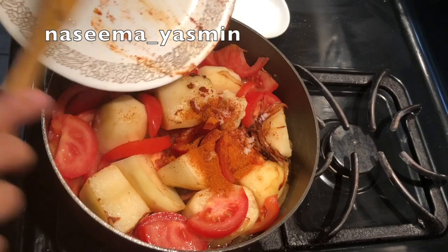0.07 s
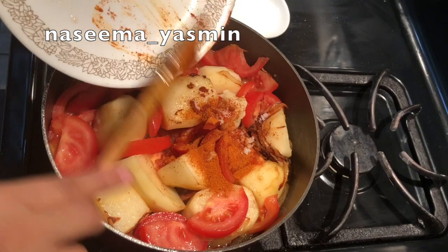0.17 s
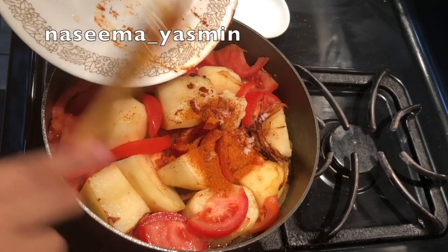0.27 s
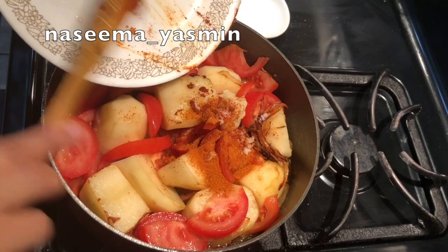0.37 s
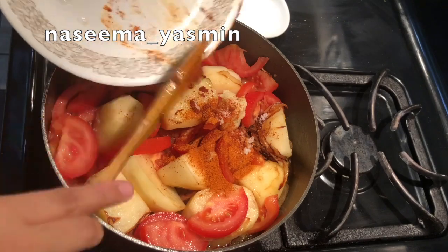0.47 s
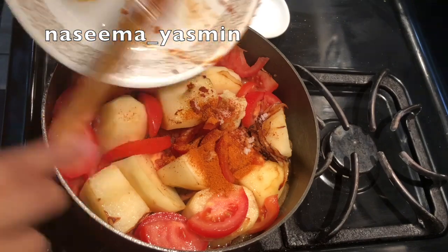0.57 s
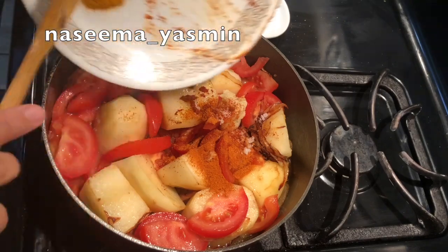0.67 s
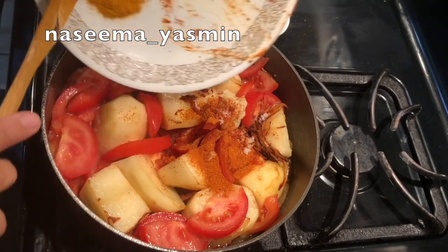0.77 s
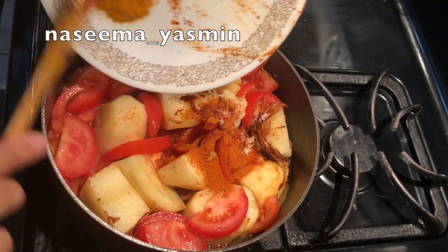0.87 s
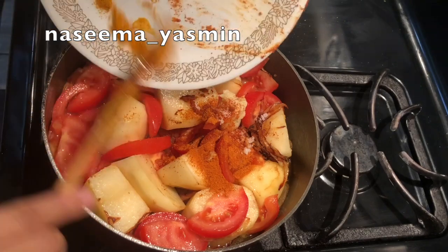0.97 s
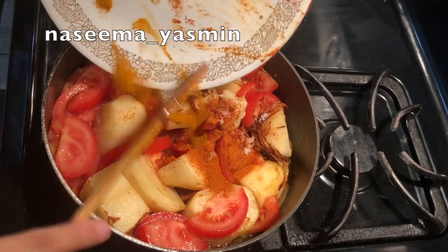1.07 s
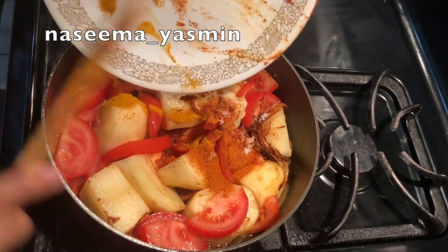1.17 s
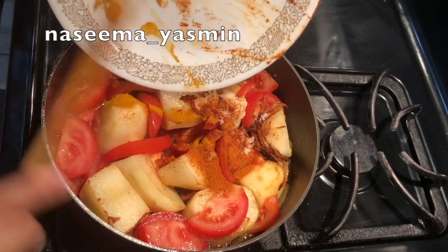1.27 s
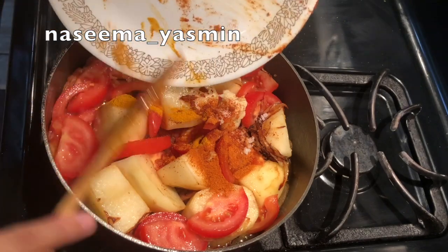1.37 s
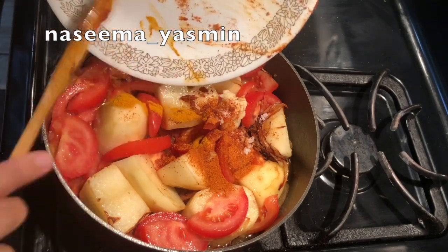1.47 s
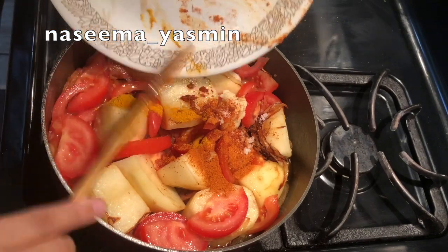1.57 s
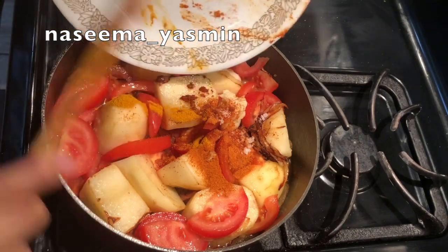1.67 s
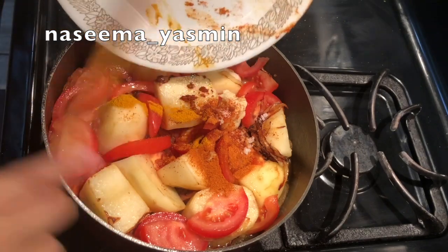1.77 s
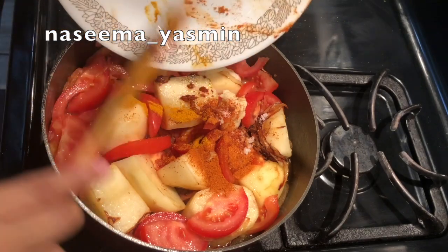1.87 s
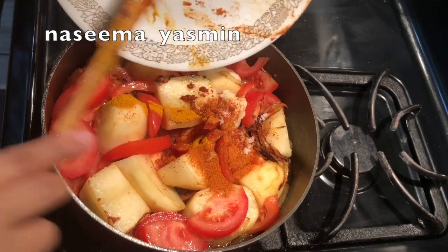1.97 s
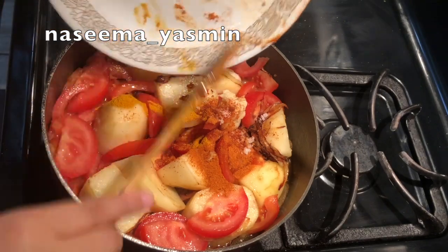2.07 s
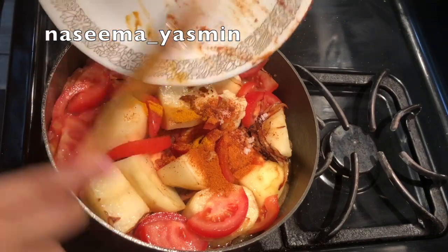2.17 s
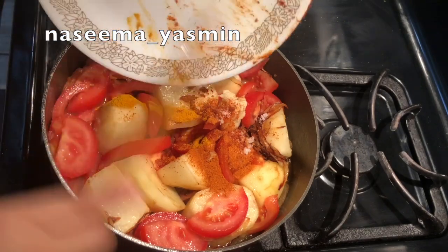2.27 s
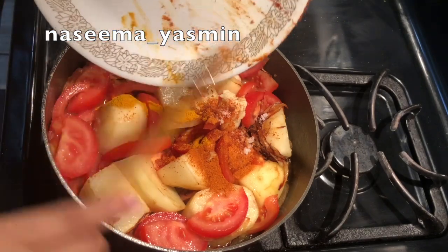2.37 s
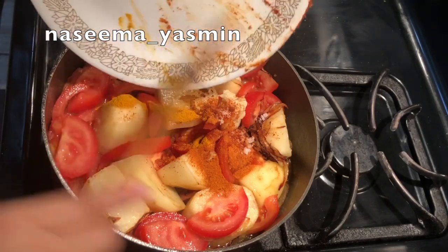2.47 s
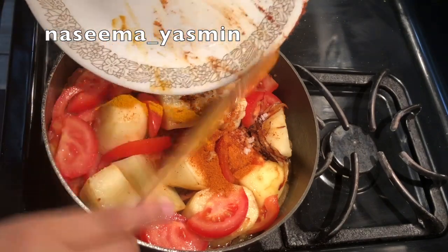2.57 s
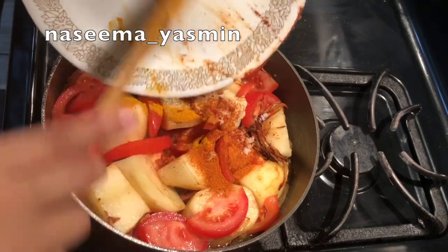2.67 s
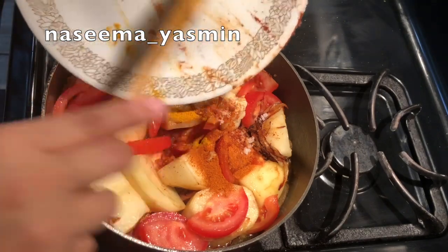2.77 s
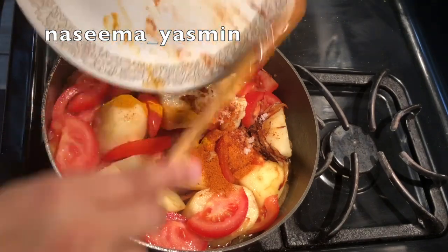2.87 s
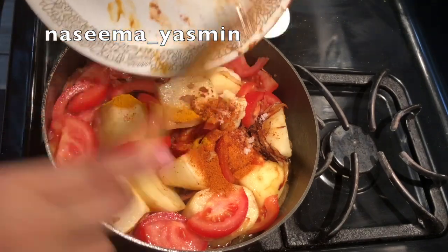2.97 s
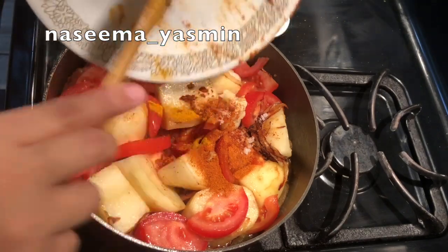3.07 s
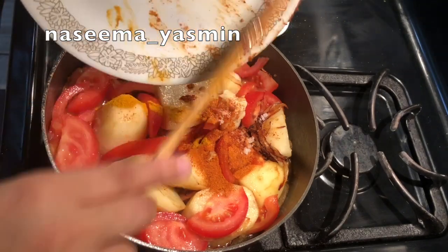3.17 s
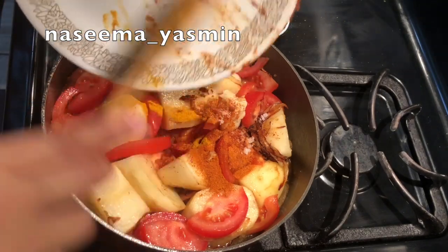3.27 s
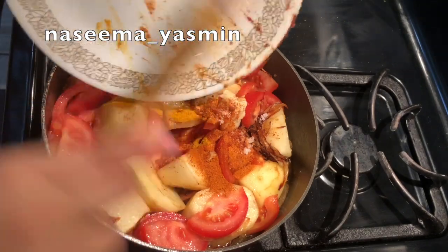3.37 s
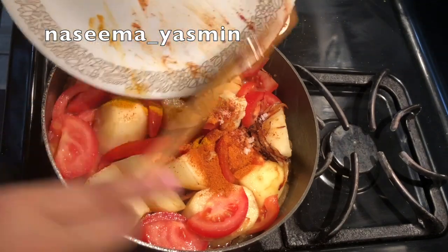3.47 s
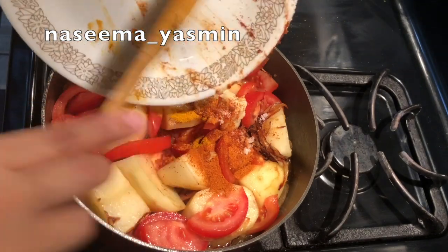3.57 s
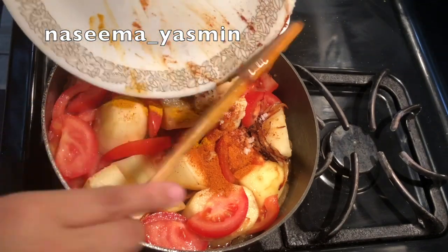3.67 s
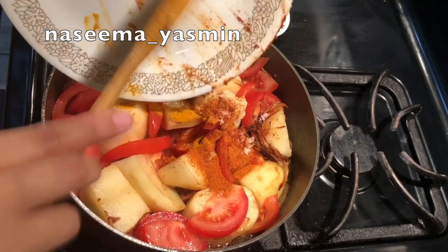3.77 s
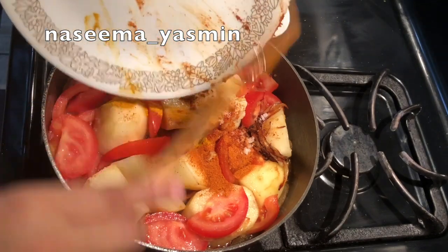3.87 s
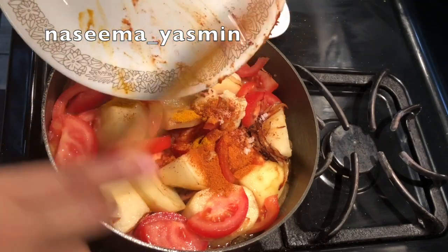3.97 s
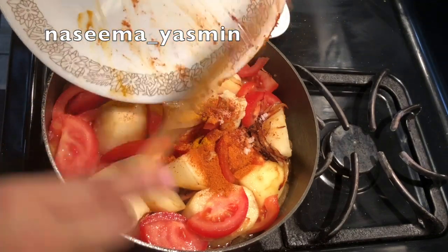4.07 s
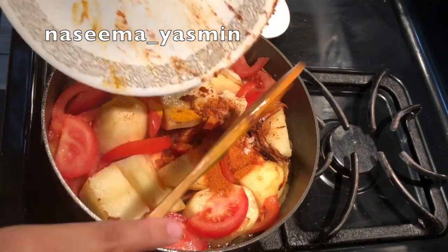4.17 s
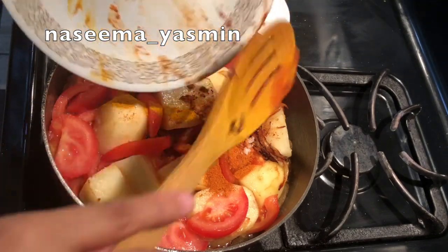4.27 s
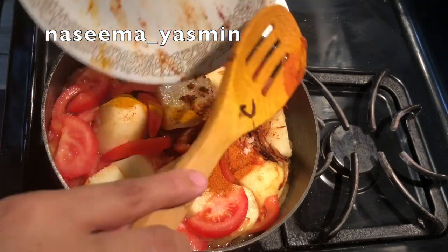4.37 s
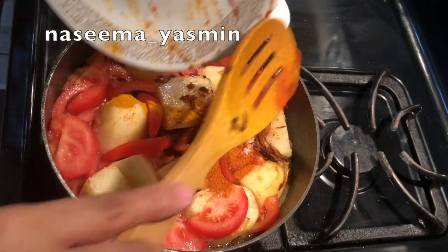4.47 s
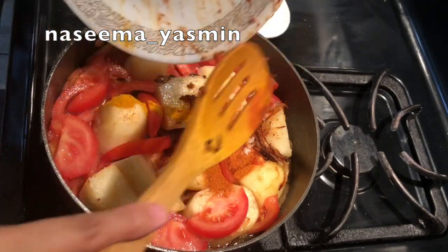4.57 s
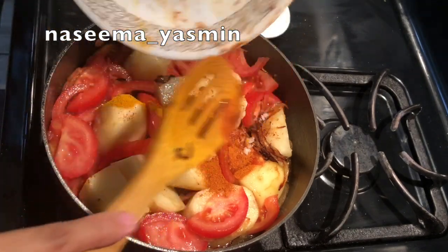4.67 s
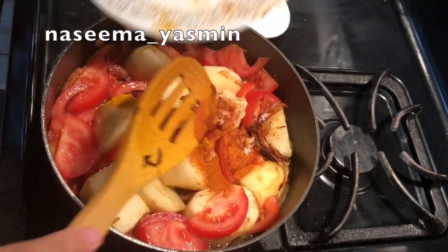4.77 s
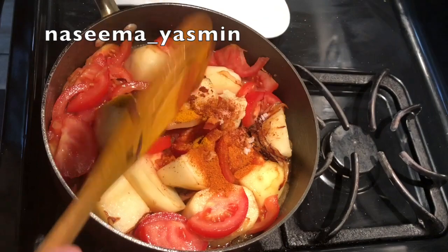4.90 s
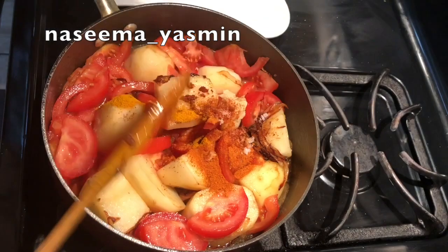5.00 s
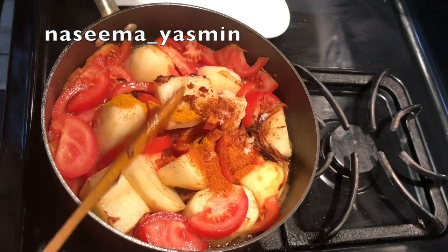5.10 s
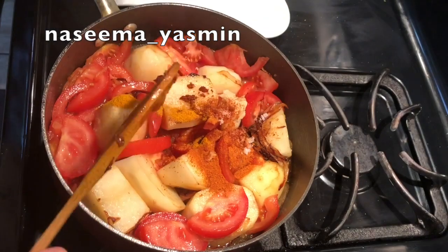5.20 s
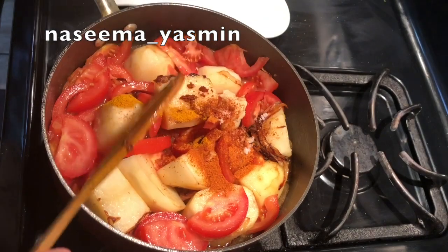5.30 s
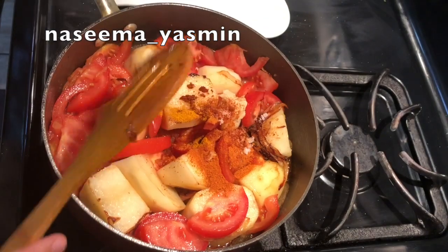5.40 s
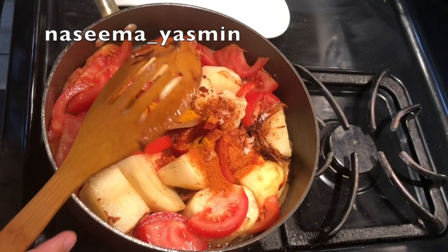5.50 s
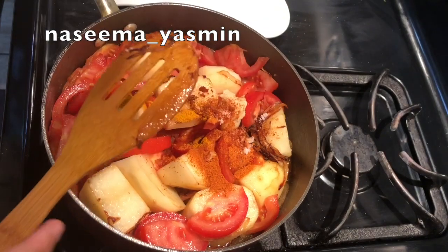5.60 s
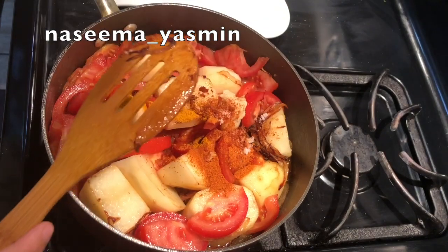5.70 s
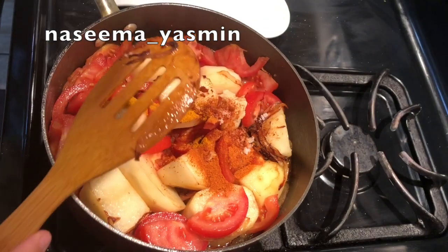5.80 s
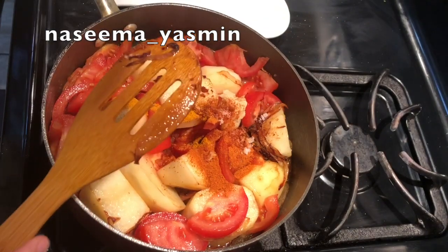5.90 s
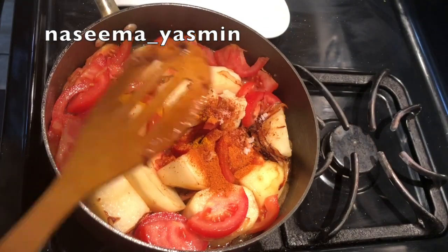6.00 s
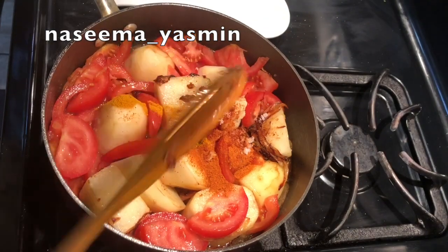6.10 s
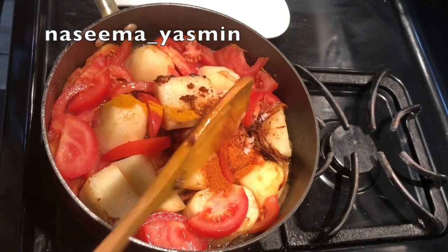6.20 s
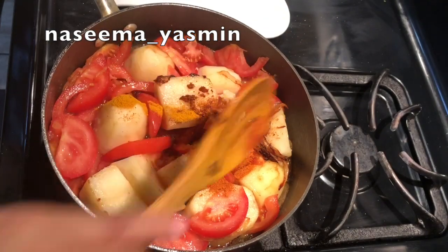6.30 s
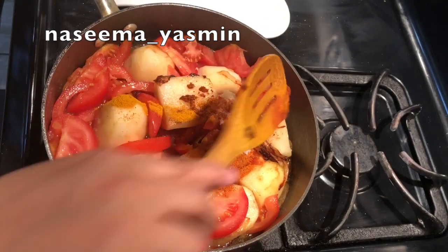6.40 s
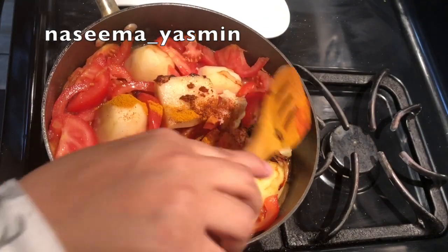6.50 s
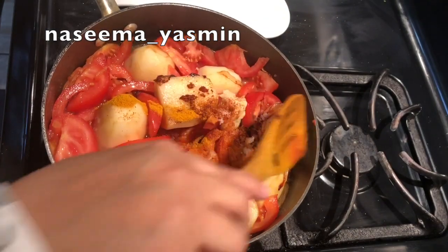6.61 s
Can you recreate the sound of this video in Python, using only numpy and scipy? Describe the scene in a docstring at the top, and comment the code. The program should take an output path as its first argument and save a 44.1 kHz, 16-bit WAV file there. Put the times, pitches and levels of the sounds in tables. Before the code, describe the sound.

Close by in a small kitchen, a pot sizzles quietly over a gas flame and a very faint appliance hum. For about four seconds a wooden spatula knocks unevenly on a ceramic plate, with quick scrapes between the ringing taps. The sizzle then brightens, something bumps the worktop twice, and the plate lands with a sharp clatter, rocking briefly before it settles and leaves only the spitting oil.

```python
"""Spatula, plate and sizzling pot

A wooden spatula taps and scrapes spices off a hand-held ceramic plate over a faintly sizzling pot.
A tap is a dull knock plus the plate's damped ring; a scrape is stick-slip driving the plate's modes.
The plate leaves the pot, the oil spits more brightly, and the plate is set down beside the stove:
two bumps and a bright clatter in a small kitchen. A burner rushes and an appliance hums throughout."""
import sys
import numpy as np
from scipy import signal
from scipy.fft import rfft, irfft
from scipy.io import wavfile
from scipy.ndimage import uniform_filter1d

SR = 44100
rng = np.random.default_rng(int(sys.argv[2]) if len(sys.argv) > 2 else 0)


def generate_wav(signal):
    """Clip the signal to [-1, 1] and save it as 16-bit WAV at the path in sys.argv[1]."""
    frames = np.transpose(np.atleast_2d(signal))
    scaled = np.clip(frames, -1, 1) * 32767
    pcm = np.round(scaled).astype(np.int16)
    wavfile.write(sys.argv[1], SR, pcm)


N = 293255
EVENT_N = int(.7 * SR)
EVENT_S = np.arange(EVENT_N) / SR  # time axis of one event
PLATE_LOW_HZ, PLATE_HIGH_HZ = 1230, 2188

# oil hiss spectrum: freq_hz, gain_db
OIL_HISS = [(1500, -22), (4000, -7), (8000, -1), (11300, 0), (13000, -6), (16000, -17)]
# weaker plate modes beside the low ring: freq_hz, gain_db, t60_s
PLATE_SIDE_MODES = [(1423, -23.5, 0.094), (1580, -21, 0.016), (1620, -15.5, 0.035)]
# plate modes reached by hard contact: freq_hz, gain_db, t60_s
PLATE_TOP_MODES = [(3615, 4.5, .09), (3990, 4.5, .05), (4790, 4, .08), (6060, 0, .043), (7440, -3, .056),
                   (8400, -1, .029)]
# short-lived spatula modes: freq_hz, gain_db, t60_s
SPATULA_MODES = [(772, -20, 0.1), (892, -1.5, 0.028), (1015, -0.5, 0.023), (1180, 0.5, 0.017)]
# spectrum of spice grit, clicks and rattle: freq_hz, gain_db
GRIT_SPECTRUM = [(300, -35), (1500, -25), (4000, 0), (7500, -0.5), (11000, -2.5), (16000, -15)]


def undb(db):
    """Decibels to gain."""
    return 10 ** (np.asarray(db) / 20)


def level(x, db):
    """Scale to an rms level."""
    return x * undb(db) / np.sqrt(np.mean(x ** 2))


def crest(x, db):
    """Scale the loudest 7 ms to an rms level."""
    return x * undb(db) / np.sqrt(uniform_filter1d(x ** 2, size=300, mode="constant").max())


def add(out, start_s, x):
    """Mix x into out."""
    i = int(start_s * SR)
    out[i:i + len(x)] += x[:N - i]


def along(points, hz):
    """Interpolate (freq_hz, value) points over log frequency."""
    freqs_hz, values = np.transpose(points)
    return np.interp(np.log(hz + 1), np.log(freqs_hz), values)


def colour(x, points):
    """Filter by (freq_hz, gain_db) points."""
    return irfft(rfft(x) * undb(along(points, np.fft.rfftfreq(len(x), 1 / SR))), len(x))


def fade(t60_s):
    """Exponential decay."""
    return np.exp(-np.log(1000) * EVENT_S / max(t60_s, 1e-3))


def swell(rise_s):
    """Smooth onset."""
    return 1 - np.exp(-(EVENT_S / rise_s) ** 2)


def ring(modes, scatter_db=0):
    """Damped modes (freq_hz, gain_db, t60_s); the spot struck randomises strength and sign."""
    draws = rng.standard_normal((len(modes), 2))
    return sum(np.sign(side) * undb(db + scatter_db * size)
               * np.sin(2 * np.pi * hz * EVENT_S) * fade(t60_s)
               for (hz, db, t60_s), (size, side) in zip(modes, draws))


def wash(spectrum_db, t60s_s):
    """Dense modes as octave bands of noise, each with its own decay."""
    spectrum = rfft(colour(rng.standard_normal(EVENT_N), spectrum_db))
    octave = np.log2(np.clip(np.fft.rfftfreq(EVENT_N, 1 / SR), 62.5, 16000) / 62.5)
    centres_hz = 62.5 * 2 ** np.arange(9)
    return sum(irfft(spectrum * np.maximum(1 - abs(octave - k), 0), EVENT_N) * fade(along(t60s_s, hz))
               for k, hz in enumerate(centres_hz))


def drive(force, response):
    """Play a force through a resonating body."""
    return signal.fftconvolve(force, response)[:len(force)]


def walk(rate_hz):
    """Random wander, spread near 1."""
    step = int(SR / rate_hz)
    return uniform_filter1d(np.repeat(rng.standard_normal(N // step + 1), step), step)[:N]


def sizzle(burner_db=-45, bubble_db=-51, spread_db=5.0, count=6000):
    """Burner rush under tiny oil bubbles, each ringing a few cycles at its own pitch."""
    # burner rush: freq_hz, gain_db
    burner_spectrum = [(15, -60), (25, -35), (40, -15), (55, -5.5), (166, -6), (206, -16), (242, -3.5),
                       (317, -5), (344, -0.5), (476, -6), (775, 0.5), (1040, 0), (2550, -1.5),
                       (10700, -17.5), (16000, -27)]
    # bursting bubbles: pitch_hz, gain_db
    pop_spectrum = [(800, -13), (2500, 0), (4500, 6), (7000, 1.5), (11000, -57), (16000, -45.5)]
    bubbles = np.zeros(N)
    t = EVENT_S[:int(.02 * SR)]
    for when, pitch, size in rng.random((count, 3)):
        hz = 1500 * 8 ** pitch
        gain = undb(spread_db * min(-np.log(size), np.pi) + along(pop_spectrum, hz))
        add(bubbles, when * N / SR, gain * np.sin(2 * np.pi * hz * t) * np.exp(-t * hz / 6))
    rush = level(colour(rng.standard_normal(N), burner_spectrum), burner_db) * undb(.5 * walk(10))
    return rush + level(bubbles, bubble_db) * undb(.5 * walk(1.3))


def crackle(level_db=-58.5, spread_db=4, max_decay_s=.013, count=260):
    """Small random spits of oil, mostly faint, each a brief puff."""
    out = np.zeros(N)
    t = EVENT_S[:2048]
    for when, size, pitch in rng.random((count, 3)):
        hz = 6000 + 7000 * pitch
        burst = rng.laplace(size=len(t)) * np.exp(-t / (max_decay_s * size + 1 / SR))
        puff = colour(burst, [(.6 * hz, -14), (hz, 0), (1.2 * hz, -14)])
        add(out, when * N / SR, puff * undb(spread_db * min(-np.log(size), np.pi)))
    return level(colour(out, OIL_HISS), level_db)


def spits(spurt_db=7.0, uncover_s=4.8, uncover_takes_s=.17, crackle_rise_db=4):
    """Juice hisses in hot oil; the plate shades sputter and crackle until it leaves the pot."""
    # loudest spits: start_s, length_s, level_db
    loud_spits = [(1.706, 0.019, -42.5), (4.41, 0.02, -42), (5.114, 0.033, -43.5), (6.435, .0047, -43.5),
                  (6.456, .054, -43.5)]
    # fine sputter: centre_hz, covered_db, uncovered_rise_db
    sputter_bands = [(3590, -55, 5.5), (7350, -60.5, 4), (11300, -64, 3)]
    out = np.zeros(N)
    for start_s, length_s, db in loud_spits:
        shape = np.sin(np.pi * np.minimum(EVENT_S / length_s, 1)).clip(0)
        add(out, start_s, crest(colour(rng.laplace(size=EVENT_N) * shape, OIL_HISS), db))
    uncovered = np.clip((np.arange(N) / SR - uncover_s) / uncover_takes_s, 0, 1)
    for hz, covered_db, rise_db in sputter_bands:
        band = colour(rng.laplace(size=N), [(.33 * hz, -30), (hz, 0), (1.8 * hz, -30)])
        spurts = undb(spurt_db * np.tanh(walk(45)))
        out += level(band * spurts, covered_db) * undb(rise_db * uncovered)
    return out + crackle() * undb(crackle_rise_db * uncovered)


def knock(bandwidth_hz, lag_at_300hz_s=.004285, scatter_energy=.21, scatter_t60_s=.039):
    """A soft blow as a bending wave: lows travel slower and arrive last, then scatter."""
    # wooden knock: freq_hz, gain_db
    knock_spectrum = [(60, -25), (130, -10.5), (250, -2), (380, 2), (650, -1.5), (1000, -8), (1800, 0.5),
                      (3000, -21), (8000, -30)]
    hz = np.fft.rfftfreq(EVENT_N, 1 / SR)
    gain = undb(along(knock_spectrum, hz)) / np.sqrt(1 + (hz / bandwidth_hz) ** 4)
    phase = 4 * np.pi * lag_at_300hz_s * np.sqrt(300 * hz)
    pulse = irfft(gain * np.exp(-1j * phase), EVENT_N) * (EVENT_S < .1)
    scatter = rng.standard_normal(EVENT_N) * fade(scatter_t60_s) * swell(.0011)
    return pulse + drive(pulse, scatter * np.sqrt(scatter_energy / np.sum(scatter ** 2)))


def taps(hand_damped_t60_s=.053, high_db_per_octave=11.5, tick_db_per_khz=5.5):
    """Wood on ceramic: harder contact excites more of the high ring and the tick."""
    # spatula strikes: start_s, knock_db, low_ring_db, clack_db, bandwidth_hz
    strikes = [(0.1334, -28, -15.5, -46, 2250), (0.438, -27, -14, -45, 2300),
               (1.2937, -27.5, -41, -29, 800), (1.563, -21.5, -18, -19.5, 1410),
               (1.8093, -21.5, -12.5, -20, 1110), (2.0065, -22.5, -17.5, -41, 2040),
               (2.277, -28.5, -41, -45, 550), (2.527, -19, -20, -29, 2160),
               (2.6512, -33.5, -52, -31.5, 1580), (2.808, -27.5, -39.5, -50, 650),
               (3.165, -23.5, -26, -47, 950), (3.389, -25.5, -28, -35, 1310), (3.641, -26, -45, -31, 1490),
               (3.871, -26, -33, -50, 730), (4.031, -42.5, -44, -35, 1100), (4.126, -26.5, -17, -16.5, 910),
               (4.4504, -39, -36, -33.5, 5500)]
    # high ring, one mode damped by the spatula, one singing on: freq_hz, gain_db, t60_s
    high_pair = [(2200, 0, .05), (2181, -11, .17)]
    out = np.zeros(N)
    for start_s, knock_db, low_db, clack_db, bandwidth_hz in strikes:
        high_db = knock_db + .5 + high_db_per_octave * min(np.log2(bandwidth_hz / PLATE_HIGH_HZ), 0)
        tick_db = knock_db - 21.5 + tick_db_per_khz * bandwidth_hz / 1000
        low = ring([(PLATE_LOW_HZ, 0, hand_damped_t60_s)] + PLATE_SIDE_MODES, scatter_db=5)
        crack = colour(rng.standard_normal(EVENT_N), GRIT_SPECTRUM) * fade(.056)
        clink = crest(ring(PLATE_TOP_MODES, scatter_db=3), -2) + crest(crack, -4)
        click = crest(colour(rng.standard_normal(EVENT_N), GRIT_SPECTRUM) * fade(.007), -6)
        tick = colour(clink + click, [(2 * bandwidth_hz, 0), (4 * bandwidth_hz, -12)])
        blow = crest(knock(bandwidth_hz), knock_db)
        clack = crest(ring(SPATULA_MODES) * swell(.00058), clack_db)
        plate = crest(low * swell(.0032), low_db) + crest(ring(high_pair), high_db)
        add(out, start_s, blow + clack + plate + crest(tick, tick_db))
    return out


def slips(length_s, slip_hz, jitter=.22, spread_db=.5, count=400):
    """Stick-slip pulses of one stroke, uneven in spacing and size."""
    spacing, size = rng.standard_normal((count, 2)).T
    times_s = np.cumsum(np.exp(jitter * spacing)) / slip_hz
    pressure = np.sin(np.pi * np.minimum(times_s / length_s, 1)).clip(0) ** .44
    return np.bincount((times_s * SR).astype(int), pressure * undb(spread_db * size), EVENT_N)[:EVENT_N]


def scrapes(free_slip_hz=1329, grip_slowing_hz=220):
    """Slips pump the plate's modes and crush spice; grip adds rub and squeak and cuts the high ring."""
    # spatula strokes: start_s, length_s, low_ring_db, grit_db, grip_0_to_1
    strokes = [(0.16, 0.071, -30, -39, 0), (0.468, 0.028, -37, -41, 0.3), (0.971, 0.062, -33, -63, 0.38),
               (1.361, 0.063, -46, -45.5, 0.44), (1.632, 0.028, -34, -37.5, 0.61),
               (1.84, 0.066, -53, -44, 0.26), (2.069, 0.035, -43, -41.5, 0.01),
               (2.114, 0.032, -25.5, -40, .75), (2.363, 0.018, -26, -44.5, 0.05),
               (2.87, 0.094, -30, -42.5, 0.88), (3.228, 0.029, -28.5, -43.5, 0.76),
               (3.461, 0.033, -23.5, -37.5, 0.89), (3.696, 0.024, -28, -40.5, 0.87),
               (3.924, 0.022, -20, -38.5, 0.93), (4.132, 0.024, -34, -40.5, 0.7)]
    out = np.zeros(N)
    for start_s, length_s, low_db, grit_db, grip in strokes:
        force = slips(length_s, free_slip_hz - grip_slowing_hz * grip)
        low = crest(drive(force, ring([(PLATE_LOW_HZ, 0, .065)] + PLATE_SIDE_MODES)), low_db)
        high = crest(drive(force, ring([(PLATE_HIGH_HZ, 0, .11)])), grit_db + 4 - 11 * grip)
        grains = force * rng.standard_normal(EVENT_N)
        grain_ring = crest(drive(grains, ring(PLATE_TOP_MODES)), -5)
        crunch = crest(colour(grains, GRIT_SPECTRUM), -.5)
        rub = crest(drive(grains, knock(990)), -51.5 + 13.5 * grip)
        squeak = crest(drive(force, ring(SPATULA_MODES)), -58 + 28 * grip)
        add(out, start_s, low + high + squeak + crest(grain_ring + crunch, grit_db) + rub)
    return out


def bumps():
    """Something heavy meets the worktop: knock, short thud, lingering boom, slight rattle."""
    # worktop blows: start_s, strength_db, rattle_db
    blows = [(5.2055, -20, -45), (5.3336, -20, -38.5), (6.589, -40, -67)]
    # struck worktop: freq_hz, gain_db
    worktop_spectrum = [(47, -41), (80, -15.5), (240, -9), (381, -5), (998, -6), (1100, -7), (1210, -5),
                        (1360, 1.5), (1530, -10), (1710, -4), (2200, -17.5), (3300, -16.5), (4490, -24),
                        (8000, -29), (10400, -57), (17600, -120)]
    out = np.zeros(N)
    for start_s, strength_db, rattle_db in blows:
        thud = wash(worktop_spectrum, [(200, .18), (1500, .1), (5000, .013)]) * swell(.00082)
        boom = wash(worktop_spectrum, [(120, 1.0), (300, .34), (700, .14), (2000, .15)]) * swell(.0059)
        rattle = wash(GRIT_SPECTRUM, [(1000, .86), (10000, .048)]) * swell(.002)
        blow = crest(knock(2000), -3) + crest(thud, -3) + crest(boom, -6)
        add(out, start_s, undb(strength_db) * blow + crest(rattle, rattle_db))
    return out


def clatter():
    """The plate lands on edge, bounces, rocks and settles flat; the worktop booms after each ping."""
    # plate landings: start_s, strength_db, edge_db, flat_db
    landings = [(5.669, -17.5, -9.5, -50), (5.7804, -19.5, -12, -40), (5.8177, -24, -12, -24),
                (5.935, -33, -26.5, -28.5), (5.9616, -35, -24.5, -29.5), (6.0197, -38, -27.5, -31),
                (6.0342, -29, -44, -22.5), (6.0635, -22.5, -21, -14)]
    # plate struck on edge: freq_hz, gain_db, t60_s
    edge_modes = [(3203, -15, .2), (3560, -1, .09), (4150, -5, .17), (5720, -11, .15), (5900, 1, .028),
                  (6005, 3, .06), (6835, -12, .13), (7108, -4, .14), (7451, -2, .13), (7806, -12, .12),
                  (8900, -9, .08), (9570, -7, .04), (9755, -13, .12), (10800, -11, .045), (13170, -17, .08),
                  (14800, -19, .05)]
    # plate landing flat: freq_hz, gain_db, t60_s
    flat_modes = [(632, -1, .14), (725, 0, .1), (925, -3, .11), (1120, -5, .13), (1235, 1, .32),
                  (1402, -6, .13), (1790, -9, .15), (1968, -6, .14), (2184, -5, .2), (2235, 0, .16),
                  (2352, -6, .15), (3600, -2, .18), (3660, -1, .14), (3770, -2, .14), (4170, -3, .13),
                  (4823, -5, .17), (5394, -4, .15), (5540, -4, .09), (7100, -7, .12)]
    # worktop and plate ringing together: freq_hz, gain_db, t60_s
    body_modes = [(98, -32, .8), (121, -27, .7), (157, -14.5, .55), (261, 0, .25), (286, -3, .15),
                  (313, -12, .2), (412, -12, .16), (570, -13, .25), (621, -10, .25), (680, -7, .19),
                  (904, -17, .33), (1233, -10, .33), (1734, -16, .2), (2015, -14, .18), (2184, -15, .33)]
    # their dense modes: freq_hz, gain_db
    dense_spectrum = [(35, -55), (60, -24), (262, -13), (469, -9.5), (1140, -7), (1220, -16), (1310, -7),
                      (2250, -11), (2520, -11), (4120, -7), (4530, -16.5), (5860, -11), (8320, -35),
                      (9130, -19.5), (16000, -42)]
    # decay of the dense modes: freq_hz, t60_s
    dense_decay = [(100, 1), (260, 0.35), (700, 0.23), (1840, 0.22), (4850, 0.17), (12800, 0.25)]
    crack_spectrum = [(500, -8), (2500, -7), (3800, -4), (6500, 3.5), (10000, -3.5), (16000, -18)]
    out = np.zeros(N)
    for start_s, strength_db, edge_db, flat_db in landings:
        crack = wash(crack_spectrum, [(2000, .036), (12000, .11)])
        ping = crest(ring(edge_modes, scatter_db=-.5), -1.1) + crest(crack, -4.5)
        edge = crest(ping * swell(.00012), edge_db)
        flat = crest(ring(flat_modes, scatter_db=1.5) * swell(.0004), flat_db)
        body = crest(ring(body_modes, scatter_db=1.5) * swell(.0084), strength_db + .5)
        dense = crest(wash(dense_spectrum, dense_decay) * swell(.013), strength_db)
        add(out, start_s, edge + flat + body + dense)
    return out


def kitchen(x, wet_db):
    """Short reverberation of a small, hard room."""
    # room decay: freq_hz, t60_s
    room_decay = [(100, 0.19), (400, 0.37), (2000, 0.27), (12000, 0.29)]
    tail = wash([(100, -1.5), (1000, -2.5), (5000, 3.0), (15000, -10.5)], room_decay) * swell(.013)
    return x + undb(wet_db) * drive(x, tail / np.sqrt(np.sum(tail ** 2)))


def scene(hum_hz=59, hum_db=-65):
    """Spatula and worktop sounds in the room, over the pot and a low appliance hum."""
    spatula = kitchen(taps() + scrapes(), wet_db=-16.5)
    worktop = kitchen(bumps() + clatter(), wet_db=-17)
    hum = level(np.sin(2 * np.pi * hum_hz * np.arange(N) / SR), hum_db)
    return (spatula + worktop + sizzle() + spits() + hum)[None]


def record(dry):
    """Thin the deep bass, round the loudest peaks, cut the top."""
    low_cut_hz, top_hz, ceiling = 46, 15900, 1.05
    thin = signal.sosfilt(signal.butter(4, low_cut_hz, "high", fs=SR, output="sos"), dry)
    rounded = ceiling * np.tanh(thin / ceiling)
    return signal.sosfilt(signal.ellip(8, .2, 70, top_hz, fs=SR, output="sos"), rounded)


dry = scene()
out = record(dry)
generate_wav(out)
```